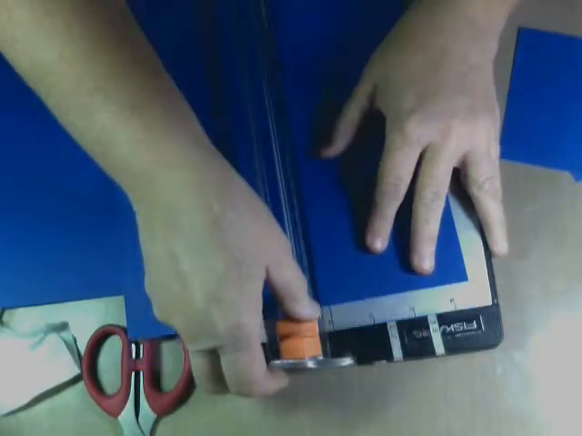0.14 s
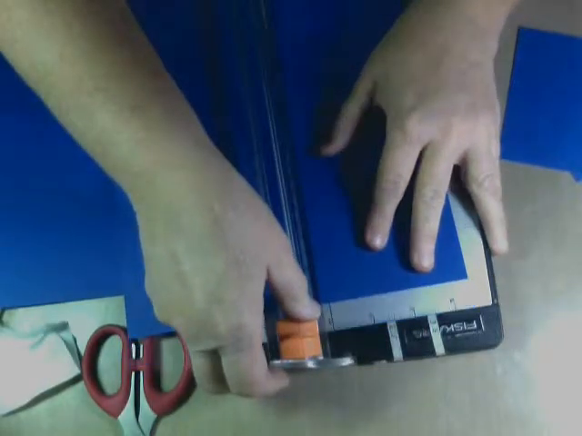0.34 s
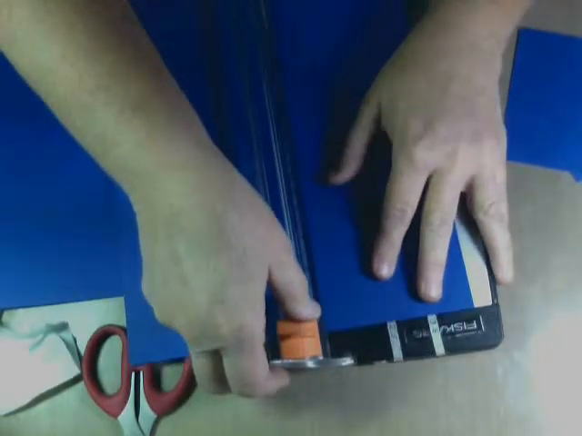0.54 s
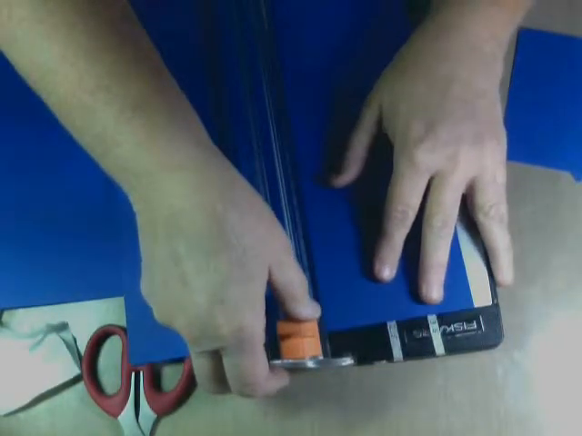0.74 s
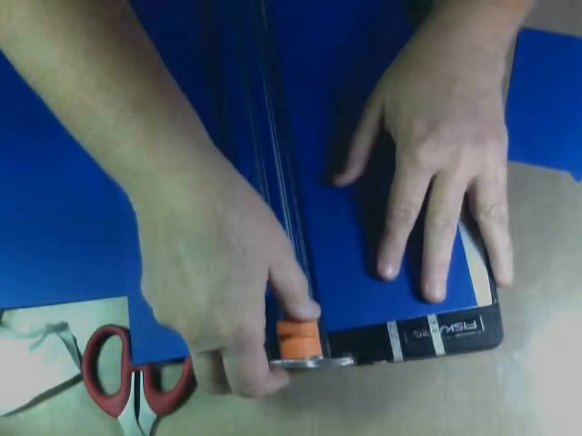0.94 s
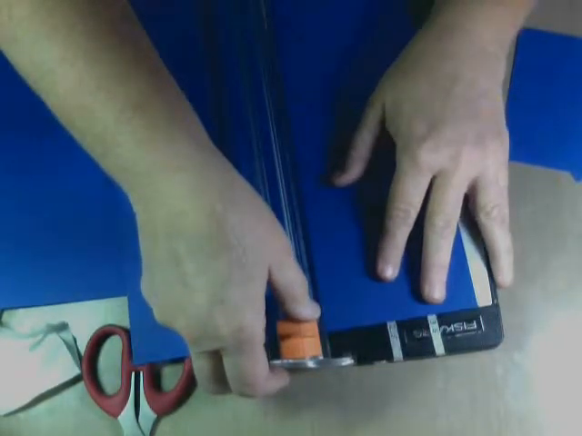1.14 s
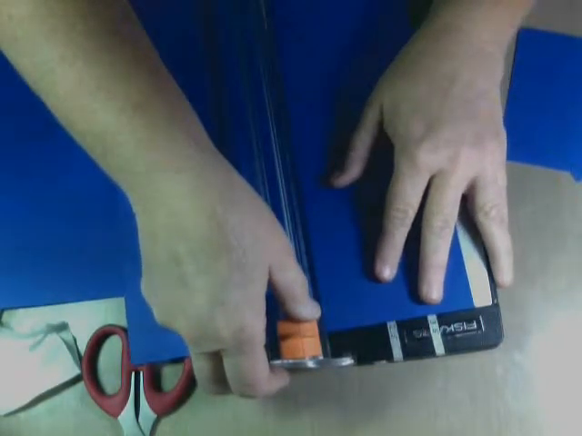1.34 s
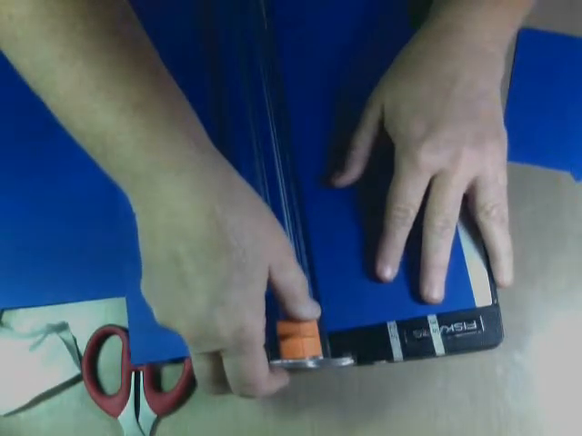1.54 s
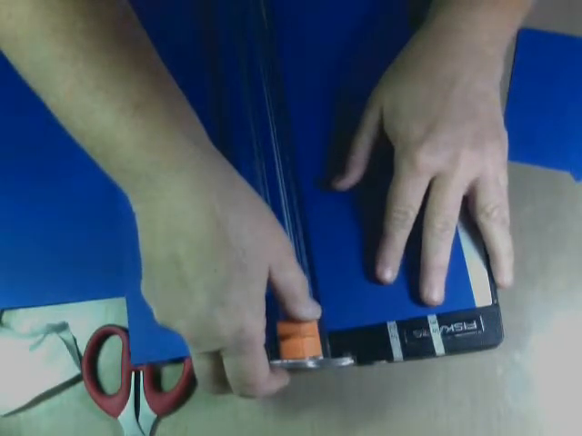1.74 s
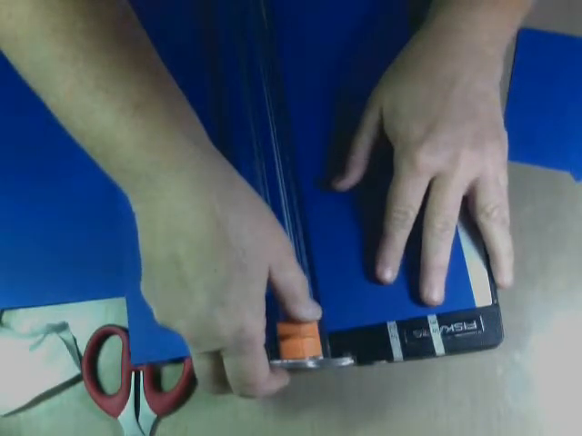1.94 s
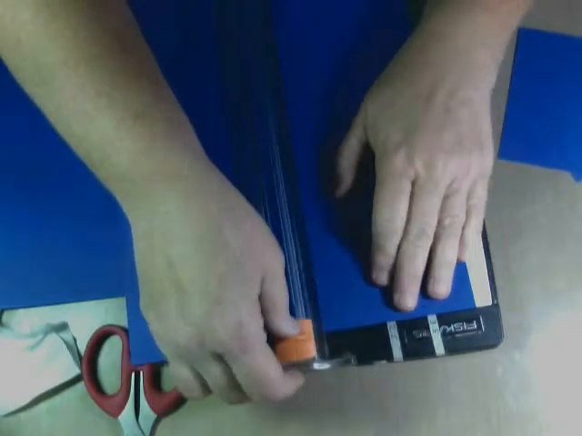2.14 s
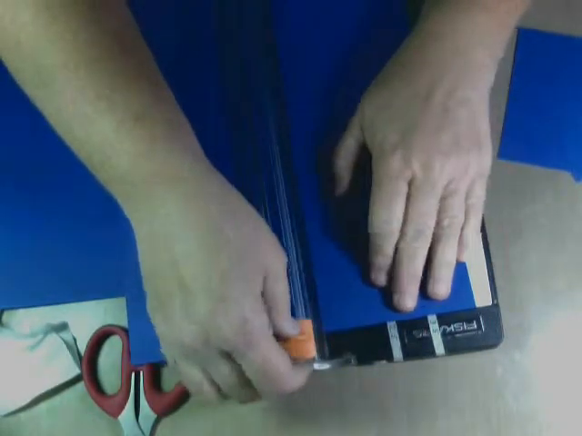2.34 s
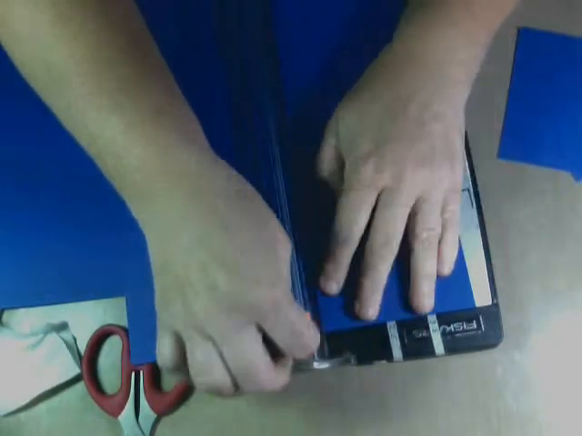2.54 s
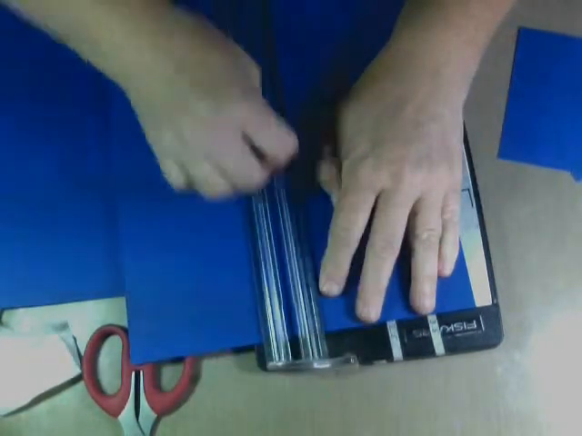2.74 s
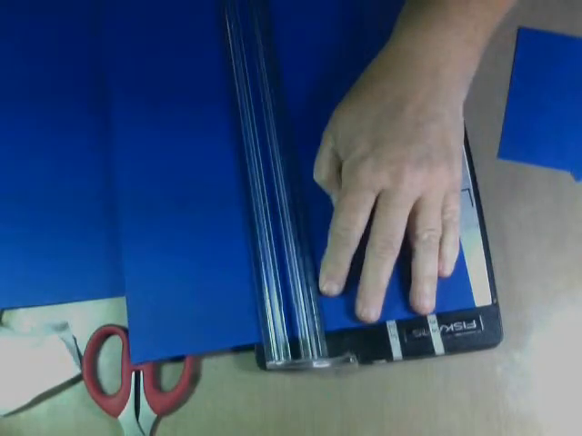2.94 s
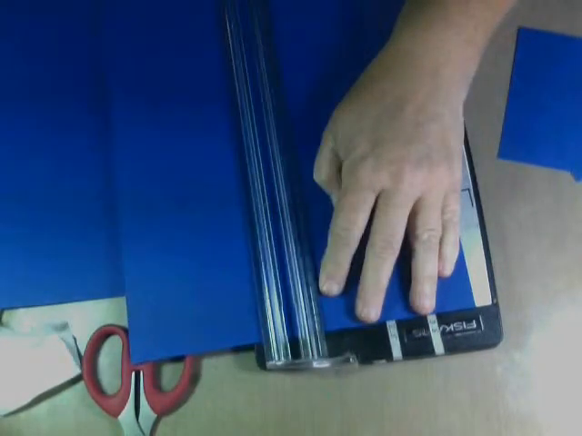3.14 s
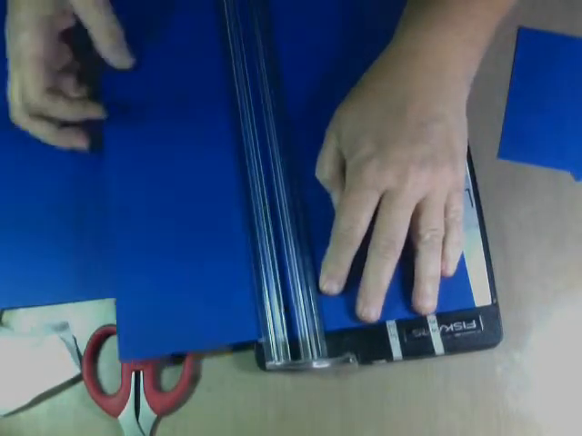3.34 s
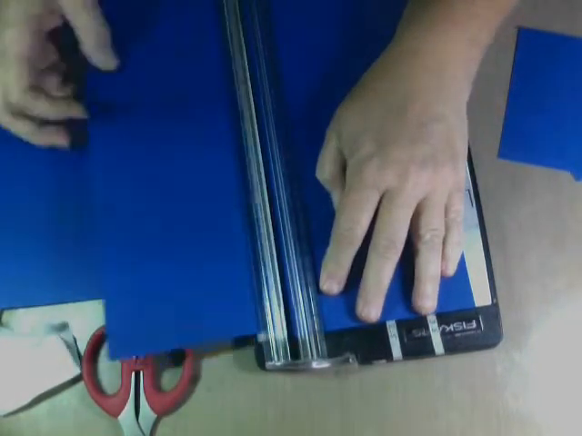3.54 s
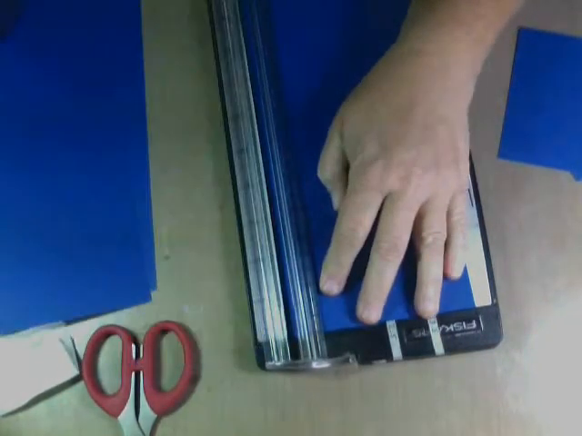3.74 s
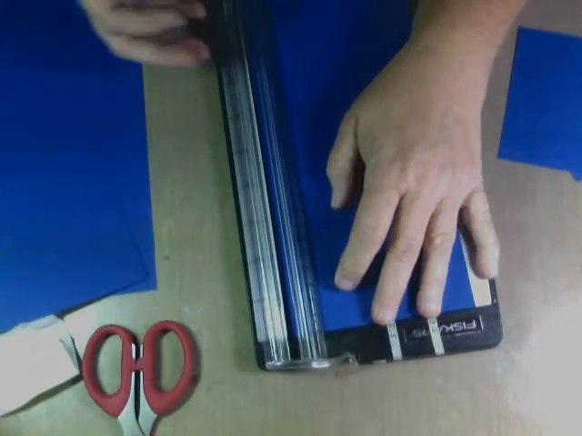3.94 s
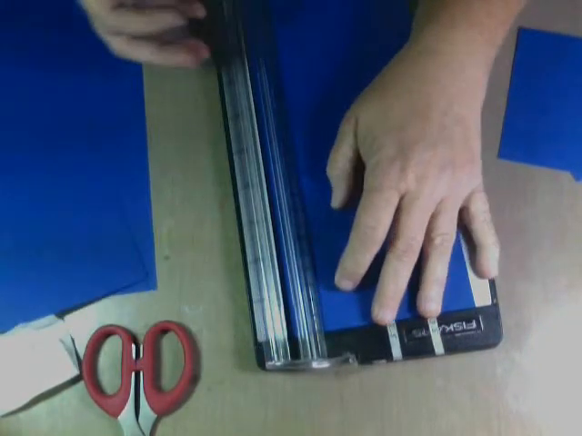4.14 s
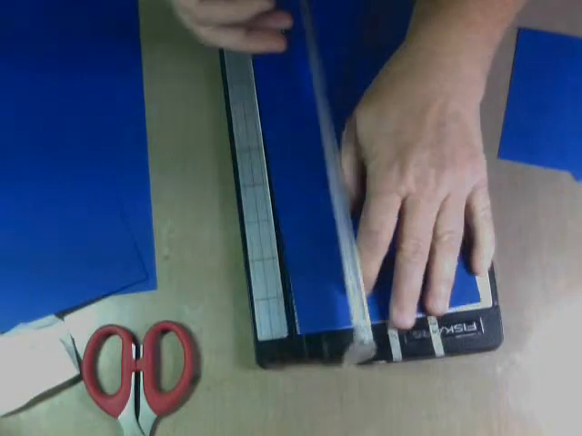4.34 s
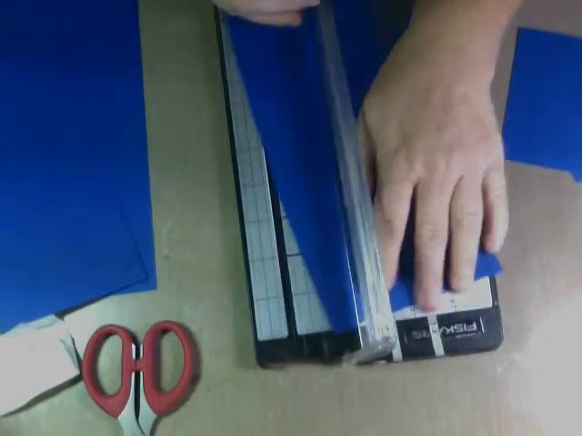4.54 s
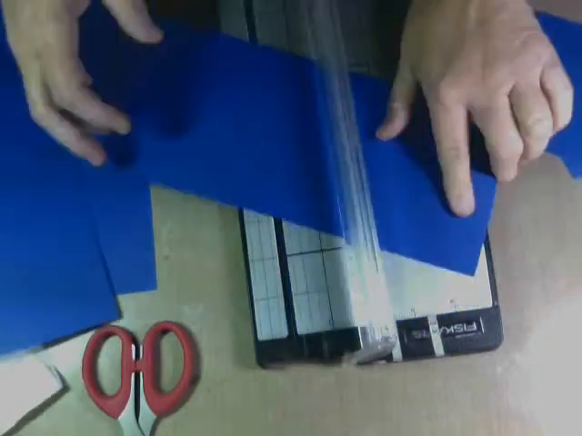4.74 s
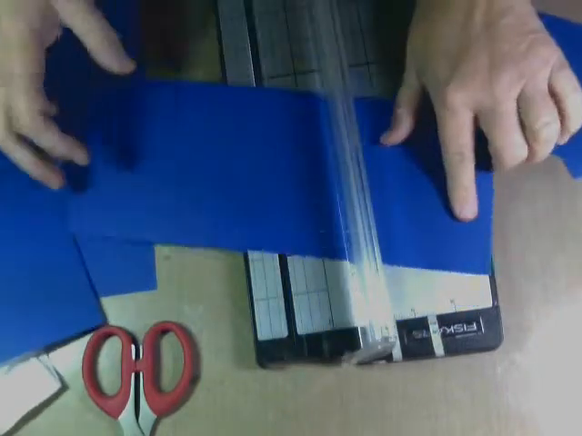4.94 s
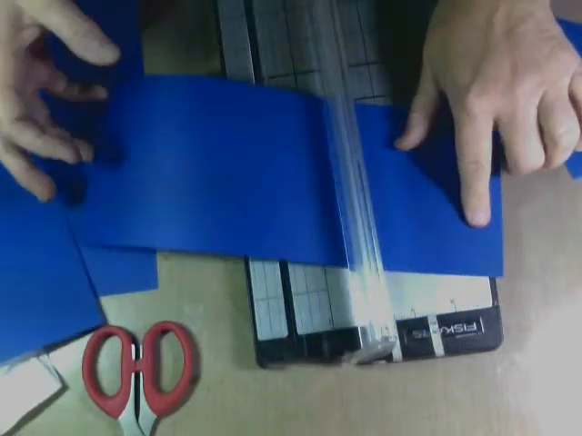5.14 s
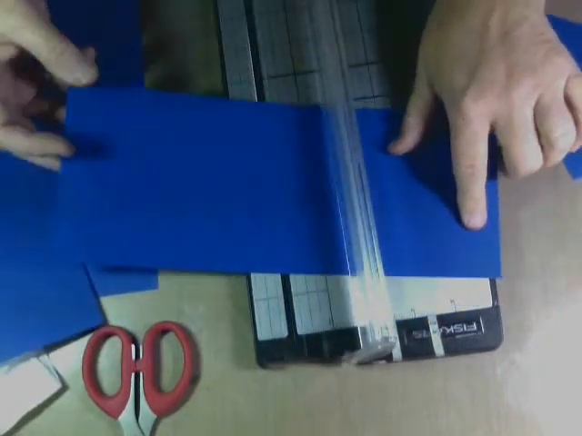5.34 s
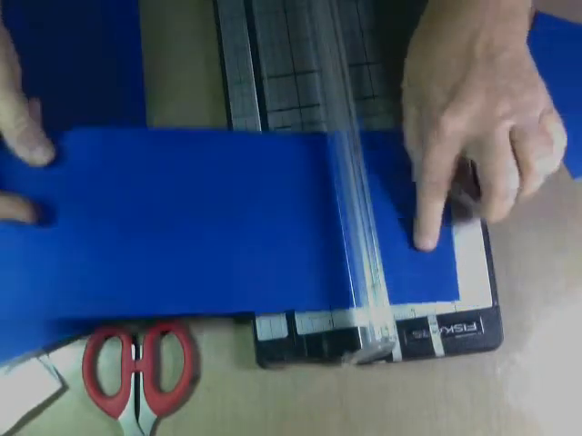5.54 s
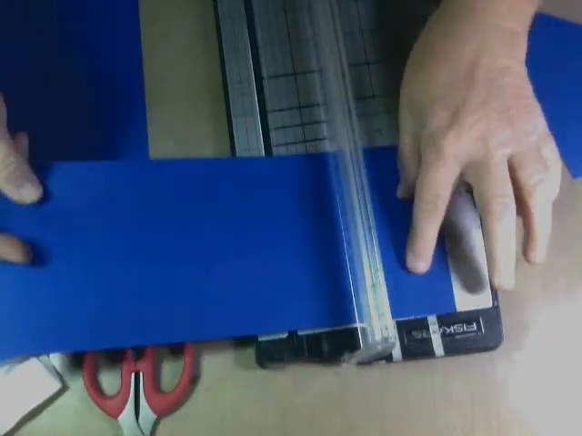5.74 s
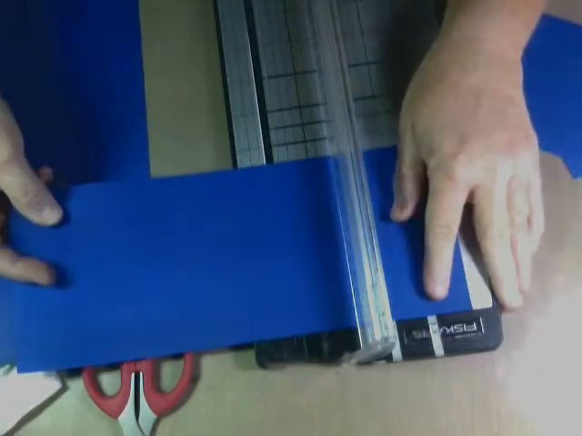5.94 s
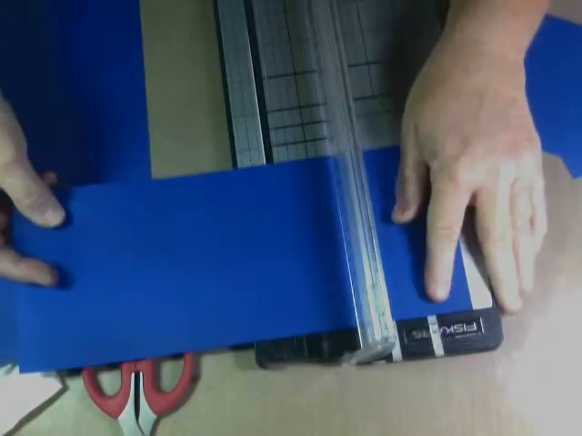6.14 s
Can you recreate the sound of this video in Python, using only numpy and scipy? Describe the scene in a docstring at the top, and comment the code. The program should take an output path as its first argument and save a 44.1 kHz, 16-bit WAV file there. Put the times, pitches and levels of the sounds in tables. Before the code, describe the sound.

A small room with a low, slightly wavering machine hum and faint hiss, heard close and dry. Two soft card rubs come at the start and around 0.5 seconds, with a light tap at 0.7; then almost only hum. At 2.2 a hollow plastic clack marks the carriage pressed in, followed by faint brushing and small knocks near 2.65. From 2.7 to 3.1 the blade rips through cardstock, rising quickly, brightest near 2.9, with rumble and short judders, ending in a very loud sharp snap and a low table thump. From 3.2 to 3.8 card scrapes and taps as the offcut goes. Soft knocks at 4.1 and 4.3 lead into hissing, rasping slides from 4.5 to 5.1. At 5.4 the sheet catches and slaps the hollow bed loudly, with a quick second bump, then a light knock at 5.7 and fading rubs until 6.

```python
"""Craft table in a small room: a sliding paper trimmer heard close up over a low hum.
The blade is pressed in, pushed through cardstock and snaps against the end of its rail; the offcut is
pulled away, then the sheet is swung round, scuffing and slapping on the plastic bed.
Friction is random slips driving resonances; impacts are decaying modes plus short noise bursts."""
import sys
import numpy as np
from scipy import signal
from scipy.fft import rfft, irfft, next_fast_len
from scipy.io import wavfile
from scipy.ndimage import uniform_filter1d

SR = 44100
rng = np.random.default_rng(int(sys.argv[2]) if len(sys.argv) > 2 else 0)


def dump(signal):
    """Clip the signal to [-1, 1] and save it as 16-bit WAV at the path in sys.argv[1]."""
    limited = np.clip(np.atleast_2d(signal).T, -1, 1)
    pcm = np.round(limited * 32767).astype(np.int16)
    wavfile.write(sys.argv[1], SR, pcm)


N = 272670
TIME = np.arange(N) / SR  # s
RING = TIME[:16384]  # time axis of one impact, s


def undb(db):
    """Decibels to gain."""
    return 10 ** (np.asarray(db) / 20)


def unit(x):
    """Scale to rms 1."""
    return x / np.sqrt(np.mean(x ** 2))


def crest(x):
    """Scale so that the loudest millisecond swings to about 1."""
    return x / np.sqrt(2 * uniform_filter1d(x ** 2, size=44).max())


def add(out, start_s, x):
    """Mix x into out from start_s."""
    i = int(start_s * SR)
    out[i:i + len(x)] += x[:N - i]


def colour(x, points):
    """Causal minimum-phase filter through (f/Hz, level/dB) points, via the folded cepstrum."""
    hz, db = np.transpose(points)
    n = 2 * next_fast_len(len(x) // 2 + 1)
    bins_hz = np.arange(n // 2 + 1) * SR / n
    gain = undb(np.interp(np.log(bins_hz + 1), np.log(hz), db))
    cepstrum = irfft(np.log(gain))
    cepstrum[1:n // 2] *= 2
    cepstrum[n // 2 + 1:] = 0
    response = np.exp(rfft(cepstrum))
    return irfft(rfft(x, n) * response)[:len(x)]


def band(x, hz, width_hz):
    """One resonance, gain 1 at its centre."""
    return signal.lfilter(*signal.iirpeak(hz, hz / width_hz, fs=SR), x)


def resonate(x, body):
    """Drive a body's resonances in parallel, signs alternating; rms 1."""
    return unit(sum((-1) ** k * undb(db) * band(x, hz, width_hz)
                    for k, (hz, width_hz, db) in enumerate(body)))


def fade(t60_s):
    """Exponential decay."""
    return np.exp(-np.log(1000) * RING / t60_s)


def ring(modes, travel_s):
    """Struck plate: bending waves take travel_s at 1 kHz, and high ones arrive sooner."""
    out = 0
    for hz, db, t60_s in modes:
        t = np.maximum(RING - travel_s * np.sqrt(1000 / hz), 0)
        out = out + undb(db) * np.sin(2 * np.pi * hz * t) * np.exp(-np.log(1000) * t / t60_s)
    return crest(out)


# hard plastic contact spectrum: f/Hz, level/dB
CONTACT_SPECTRUM = [(200, 2.5), (700, -1.5), (2000, -1), (5000, -3), (9000, -7), (13000, -9), (16000, -20)]


def burst(t60_s):
    """Dying noise of countless small plastic modes."""
    return unit(colour(rng.standard_normal(len(RING)), CONTACT_SPECTRUM)) * fade(t60_s)


def walk(rate_hz):
    """Smooth random drift, rms 1."""
    k = int(SR / rate_hz)
    steps = np.repeat(rng.standard_normal(N // k + 1), k)[:N]
    return unit(uniform_filter1d(steps, k))


def grains(per_s, spread_db, patchy_db):
    """Friction: dense tiny slips of unequal size that come in patches."""
    hits = (rng.random(N) < per_s / SR) * rng.choice([-1, 1], N)
    slips = hits * undb(spread_db * rng.standard_normal(N))
    return unit(slips * undb(patchy_db * walk(110)))


def swell(start_s, length_s, attack, release):
    """One hand movement: smooth rise, hold, smooth fall; attack and release are shares of length."""
    at = (TIME - start_s) / length_s
    ramp = np.minimum(at / attack, (1 - at) / release).clip(0, 1)
    return np.sin(np.pi / 2 * ramp)


# room air spectrum: f/Hz, level/dB
AIR_SPECTRUM = [(12, -39), (20, -3.5), (65, -5.5), (86, -5), (150, -6.5), (182, -14.5), (277, -19),
                (347, -23), (377, -24), (513, -26), (642, -29), (1090, -30), (1960, -37.5), (14700, -46.5),
                (16000, -49)]
# machine hum tones: f/Hz, level/dB
HUM_TONES = [(29.8, -54.5), (59.7, -47), (89.5, -55.5), (140.7, -54), (208, -64), (354, -70.5)]
AIR_DB = -44  # rms


def room():
    """Low machine hum wavering in level and phase, over rumble and smooth hiss of filtered noise."""
    air = undb(AIR_DB) * unit(colour(rng.standard_normal(N), AIR_SPECTRUM))
    hum = np.zeros(N)
    for hz, db in HUM_TONES:
        level = undb(db + 0.79 * walk(4.5))
        phase = 2 * np.pi * hz * TIME + 0.53 * walk(3.045)
        hum += level * unit(np.sin(phase))
    return air + hum


# card face hiss spectrum: f/Hz, level/dB
FACE_SPECTRUM = [(2000, -19), (4000, -7), (4900, -7.5), (5500, -2.5), (6200, -3), (7200, -2.5), (10000, 2),
                 (12500, -0.5), (16000, -7.5)]
# sheet pinned flat under the arm, resonances: f/Hz, width/Hz, level/dB
PINNED_SHEET = [(1610, 170, -6), (2110, 105, -1), (2640, 170, -8), (3260, 220, -10.5), (5200, 1000, -9.5)]
# loose sheet resonances: f/Hz, width/Hz, level/dB
LOOSE_SHEET = [(1470, 320, -3.5), (1870, 180, -1), (2126, 180, -0.5), (2614, 230, -2), (3000, 176, -0.5),
               (3400, 450, -1.5), (4320, 1460, -5.5), (5700, 460, -3)]
# hollow bed resonances, also driven by flexing(): f/Hz, width/Hz, level/dB
BED_DRUM = [(246, 115, -3.5), (550, 200, -7.5), (826, 166, 0.5), (992, 155, -2.5), (1144, 160, -3)]
# pushes of the card by hand: t/s, length/s, face hiss level/dB, edge rasp level/dB
PUSHES = [(.005, 0.26, -55.5, -58), (0.478, 0.23, -55, -57.5), (2.365, 0.13, -56, -65),
          (2.483, .13, -56, -59), (3.64, 0.17, -53.5, -49.5), (4.39, 0.19, -56.5, -63),
          (4.495, .3, -45, -58), (4.724, 0.22, -48, -47.5), (4.889, .1, -50, -49),
          (4.969, 0.14, -46, -44.5), (5.104, .2, -54.5, -54.5), (5.45, 0.14, -51.5, -51),
          (5.519, 0.26, -53.5, -53), (5.723, 0.43, -63.5, -59.5), (5.954, 0.11, -65, -70)]
# sheet catches and drags: t/s, length/s, level/dB, scrape centre f/Hz, hiss level/dB re scrape
CATCHES = [(3.387, 0.027, -49, 2000, -6), (3.436, 0.071, -62, 2400, 5), (3.491, 0.043, -39.5, 1900, -3.5),
           (3.519, .034, -37.5, 2200, -1.5), (3.565, 0.036, -45, 1680, -1.5), (3.6, .043, -50, 1400, -10),
           (3.657, 0.042, -47.5, 2000, -16), (3.761, 0.029, -48, 2150, -1.5),
           (3.841, .055, -53.5, 2210, -6.5), (4.729, 0.045, -48.5, 3340, -7),
           (4.798, 0.06, -42.5, 3000, -3.5), (4.898, 0.028, -42.5, 2400, -1),
           (4.911, 0.045, -47.5, 1850, -20), (4.983, 0.033, -40.5, 3000, -11),
           (5.034, 0.018, -41, 1870, -10), (5.07, 0.025, -47.5, 2480, -16), (5.276, 0.033, -42, 1860, -19),
           (5.38, .034, -35.5, 3180, -10), (5.409, 0.073, -53, 2580, 4), (5.531, 0.028, -53, 3220, -1),
           (5.703, 0.019, -48.5, 1700, -13)]
FREED_S = 3.3  # sheet free of the blade from here on
PUSH_ATTACK, PUSH_RELEASE = 0.28, 0.33  # shares of length
CATCH_ATTACK, CATCH_RELEASE = 0.31, 0.41  # shares of length
WOBBLE_DB, WOBBLE_HZ = 1.56, 35  # unsteady hand pressure
DRAG_DB, CRACKLE_DB = -7.5, -7.5  # re rasp: bed drumming; single fibres snapping at the edge


def card():
    """The sheet's face hisses over the bed; its edge rasps and rings the sheet, in spurts where it catches."""
    face = unit(colour(grains(per_s=12000, spread_db=3.5, patchy_db=0.5), FACE_SPECTRUM))
    pinned_slips = grains(per_s=9000, spread_db=1.5, patchy_db=0.5)
    pinned = resonate(band(pinned_slips, 2600, 3800), PINNED_SHEET)
    rasp = grains(per_s=4500, spread_db=3.5, patchy_db=1.0)
    crackle = grains(per_s=130, spread_db=3, patchy_db=-0.5)
    loose = resonate(band(rasp + undb(CRACKLE_DB) * crackle, 1970, 7700), LOOSE_SHEET)
    drag = resonate(grains(per_s=1400, spread_db=1.0, patchy_db=1.2), BED_DRUM)
    edge = np.where(TIME < FREED_S, pinned, loose) + undb(DRAG_DB) * drag
    pressure = undb(WOBBLE_DB * walk(WOBBLE_HZ))
    out = np.zeros(N)
    for start_s, length_s, hiss_db, rasp_db in PUSHES:
        push = pressure * swell(start_s, length_s, PUSH_ATTACK, PUSH_RELEASE)
        out += push * (undb(hiss_db) * face + undb(rasp_db) * edge)
    for start_s, length_s, db, hz, hiss_db in CATCHES:
        span = slice(int(start_s * SR), int((start_s + length_s) * SR))
        # free length of card behind the catching edge sets the colour
        scrape = unit(band(loose[span], hz, 0.5 * hz)) + undb(hiss_db) * face[span]
        envelope = swell(start_s, length_s, CATCH_ATTACK, CATCH_RELEASE)[span]
        add(out, start_s, undb(db) * scrape * envelope)
    return out


# plastic bed and guide arm modes: f/Hz, level/dB, t60/s
BED_MODES = [(706, -1, 0.027), (756, 0, 0.049), (953, -4.5, 0.063), (1006, -12, 0.065), (1161, 1.5, 0.03),
             (1228, -4, 0.034), (1376, -6.5, 0.025), (1587, -6, 0.042), (1817, -5, 0.029),
             (2016, -0.5, 0.027), (2290, -7.5, 0.043), (2570, -21, .03), (2970, -5, 0.033),
             (3400, -25, 0.022)]
# table top thump modes, also rung by end_stop(): f/Hz, level/dB, t60/s
TABLE_MODES = [(136, 2, 0.14), (199.4, -4, 0.15), (261, -9, 0.12), (382, -19, 0.096)]
# card and fingers knocking on the bed: t/s, level/dB, blow centre f/Hz, contact tick level/dB re knock
KNOCKS = [(.672, -33, 950, -11), (2.620, -42, 900, -2), (2.6634, -31.5, 700, -3.5), (3.187, -31, 1030, -15),
          (3.373, -31, 1500, -4), (3.406, -31.5, 1950, -8), (3.486, -31.5, 1510, -3),
          (3.595, -31, 1300, -16), (3.613, -32, 860, -21), (4.101, -35, 850, -28), (4.309, -30, 1390, -18),
          (4.3188, -26.5, 1150, -26), (4.5445, -30, 1100, -1), (4.840, -30, 1000, 0),
          (5.328, -39.5, 2110, -13), (5.4056, -23, 1400, -5), (5.4128, -5.5, 1350, -13),
          (5.419, -14.5, 1270, -26), (5.433, -23, 730, -28), (5.4439, -14, 760, -38),
          (5.698, -26.5, 646, -24)]
KNOCK_THUMP_DB = -26  # table, re knock


def taps():
    """Each knock ticks, rings the bed around its own pitch and thumps the table."""
    out = np.zeros(N)
    modes = ring(BED_MODES, travel_s=0.001634)
    thump = undb(KNOCK_THUMP_DB) * ring(TABLE_MODES, travel_s=0.0012)
    thin_plate = signal.butter(2, 520, "high", fs=SR)  # a thin plate radiates little bass
    for start_s, db, hz, tick_db in KNOCKS:
        body = signal.lfilter(*thin_plate, modes + undb(-1.5) * burst(t60_s=0.051))
        for _ in range(2):
            body = band(body, hz, 1.07 * hz)
        tick = undb(tick_db) * crest(burst(t60_s=0.015))
        add(out, start_s, undb(db) * (crest(body) + thump + tick))
    return out


# dry clicks of card edge and blade: t/s, peak level/dB
EDGE_CLICKS = [(1.243, -48), (2.1897, -26), (2.2, -30.5), (2.253, -46), (4.345, -41.5), (4.358, -42.5),
               (5.121, -33), (5.439, -29), (5.465, -30)]


def clicks():
    """Card edge and blade click dry: broad noise dying at once."""
    out = np.zeros(N)
    for start_s, db in EDGE_CLICKS:
        click = band(rng.standard_normal(len(RING)), 3000, 16000) * fade(t60_s=0.021)
        add(out, start_s, undb(db) * crest(click))
    return out


# carriage pressed into the card, modes: f/Hz, level/dB, t60/s
PRESS_MODES = [(351, -16, 0.14), (768, -6, 0.05), (950, -3, 0.042), (995, 1.5, 0.04), (1400, -6.5, 0.035),
               (1950, -13, .04), (2245, -8, 0.033), (2780, -15, .025)]
PRESS_S, PRESS_DB = 2.1942, -14.5


def press():
    """The thumb pushes the carriage home: a hollow clack and a short buzz of loose plastic."""
    clack = ring(PRESS_MODES, travel_s=0.00048) + undb(-7.0) * crest(burst(t60_s=0.019))
    buzz = undb(-20.5) * burst(t60_s=0.07)
    out = np.zeros(N)
    add(out, PRESS_S, undb(PRESS_DB) * (clack + buzz))
    return out


STOP_S, STOP_DB = 3.0953, -3.5  # carriage reaches the end stop
# tearing fibres spectrum: f/Hz, level/dB
FIBRE_SPECTRUM = [(650, -35), (1100, -9), (1150, -6), (1420, -7), (1570, -9), (2150, -13), (2380, -9),
                  (5050, -11), (5900, -8.5), (7390, -11), (12200, -7), (15500, -13.5), (16000, -14)]
# blade holder resonances at slow entry: f/Hz, width/Hz, level/dB
HOLDER_BODY = [(1450, 150, -0.5), (3060, 240, -2), (3550, 260, -2.5), (4770, 580, -6), (5900, 380, -5)]
# running carriage resonances: f/Hz, width/Hz, level/dB
RAIL_BODY = [(257, 220, -3), (550, 110, 1.5), (630, 71, 1.5), (717, 96, 0), (970, 82, 1), (1390, 140, -5.5),
             (2040, 340, -3.5), (3800, 300, -18)]
# carriage sticks and judders: t/s, length/s, rms level/dB, f/Hz
JUDDER_EVENTS = [(2.794, .02, -44, 1030), (2.853, 0.026, -32.5, 1028), (2.875, 0.018, -37.5, 610),
                 (2.909, 0.013, -31.5, 728), (2.93, .017, -35.5, 610), (2.95, 0.018, -39, 665)]
CUT_START_S, CUT_PEAK_S, BITE_S = 2.675, 2.89, 0.039  # start, fastest point, fade-in
TEAR_DB, ENTER_DB, LEAVE_DB = -34, -8, -9  # at full speed; change at entry and exit
GLIDE_DB = -7  # carriage re tearing
RUMBLE_S, RUMBLE_DB, RUMBLE_FALL_DB_PER_S = 2.85, -36, 39
JUDDER_RASP_DB = -7.5  # rms-1 rasp against a peak-1 tone


def blade():
    """Fibres part under the blade, louder with speed; the carriage rumbles and judders along the rail."""
    cutting = np.clip((TIME - CUT_START_S) / BITE_S, 0, 1) * (TIME < STOP_S)
    speeding = np.clip((CUT_PEAK_S - TIME) / (CUT_PEAK_S - CUT_START_S), 0, 1)
    slowing = np.clip((TIME - CUT_PEAK_S) / (STOP_S - CUT_PEAK_S), 0, 1)
    tear = cutting * undb(TEAR_DB + ENTER_DB * speeding + LEAVE_DB * slowing ** 2)
    since_s = np.maximum(TIME - RUMBLE_S, 0)
    chatter = cutting * np.minimum(since_s / .012, 1) * undb(RUMBLE_DB - RUMBLE_FALL_DB_PER_S * since_s)
    rumble = np.hypot(undb(GLIDE_DB) * tear, chatter)
    slips = grains(per_s=7000, spread_db=1.0, patchy_db=1.4)
    # power share of the holder: slow start rings it; at speed the tearing is broad and bright
    slow = np.interp(TIME, [2.7, 2.86], [.5, .05]).clip(0, 1)
    holder = resonate(grains(per_s=7000, spread_db=2, patchy_db=1.2), HOLDER_BODY)
    fibres = np.sqrt(1 - slow) * unit(colour(slips, FIBRE_SPECTRUM)) + np.sqrt(slow) * holder
    rail_slips = grains(per_s=1500, spread_db=3.5, patchy_db=1.0)
    carriage = resonate(band(rail_slips, 700, 1240), RAIL_BODY)
    runners = unit(band(band(rng.standard_normal(N), 210, 160), 210, 160))
    out = tear * (fibres + undb(-11) * runners) + rumble * carriage
    for start_s, length_s, db, hz in JUDDER_EVENTS:
        n = int(length_s * SR)
        phase = 2 * np.pi * np.cumsum(hz * (1 + 0.043 * walk(480)[:n])) / SR
        tone = np.sin(phase)
        # the blade rasps on each positive half-swing
        rasp = unit(band(rng.standard_normal(n) * np.maximum(tone, 0), 2200, 3400))
        judder = (tone + undb(JUDDER_RASP_DB) * rasp) * signal.windows.tukey(n, .8)
        add(out, start_s, undb(db) * unit(judder))
    return out


# carriage against end stop, modes: f/Hz, level/dB
STOP_MODES = [(380, -12), (716, -4), (1000, -9.5), (1440, -3.5), (1960, -4), (2490, -5), (3010, -5.5),
              (3830, -2), (4170, 1), (4660, 2), (5720, -0.5), (7430, -17), (8300, 0), (9200, -6),
              (11700, -12)]


def end_stop():
    """The carriage snaps against the stop, the rail buzzes and the table thumps a moment later."""
    # lossy plastic: high modes die sooner
    modes = [(hz, db, .03 * np.sqrt(1000 / hz)) for hz, db in STOP_MODES]
    small_part = signal.butter(2, 480, "high", fs=SR)  # a small part radiates little bass
    crack = signal.lfilter(*small_part, burst(t60_s=0.017))
    snap = crest(ring(modes, travel_s=0.00062) + 0.76 * crest(crack))
    buzz = undb(-21.5) * signal.lfilter(*small_part, burst(t60_s=0.1))
    thump = undb(-12.5) * ring(TABLE_MODES, travel_s=.002)
    out = np.zeros(N)
    add(out, STOP_S, undb(STOP_DB) * (snap + buzz + thump))
    return out


# card bends as it is lifted: t/s, length/s, level/dB
BENDS = [(3.495, 0.039, -48), (3.522, 0.043, -40.5), (3.584, 0.072, -42), (3.665, 0.049, -46.5),
         (4.093, .035, -45), (4.301, .16, -46), (4.408, .032, -43), (4.496, 0.11, -51), (4.739, 0.034, -48),
         (4.819, .04, -46.5), (4.85, 0.23, -55), (5.377, 0.081, -45)]
BEND_ATTACK, BEND_RELEASE = 0.34, .35  # shares of length


def flexing():
    """Bent card slips in coarser steps that drum on the hollow bed."""
    strain = sum(undb(db) * swell(start_s, length_s, BEND_ATTACK, BEND_RELEASE)
                 for start_s, length_s, db in BENDS)
    slips = grains(per_s=1400, spread_db=2.5, patchy_db=1.0)
    return strain * resonate(band(slips, 640, 1200), BED_DRUM)


def scene():
    """Everything on the table, with the short echo of a small room; both channels alike."""
    work = card() + taps() + clicks() + press() + blade() + end_stop() + flexing()
    echo = burst(t60_s=0.19) * np.clip(RING / 0.019, 0, 1)
    walls = signal.fftconvolve(work, echo / np.linalg.norm(echo))[:N]
    return np.tile(work + undb(-23) * walls + room(), (2, 1))


TOP_HZ = 15800


def record(dry):
    """The recorder clips at full scale and cuts everything above TOP_HZ."""
    low_pass = signal.ellip(10, .2, 70, TOP_HZ, fs=SR, output="sos")
    return signal.sosfilt(low_pass, np.clip(dry, -1, 1))


dry = scene()
out = record(dry)
dump(out)
```